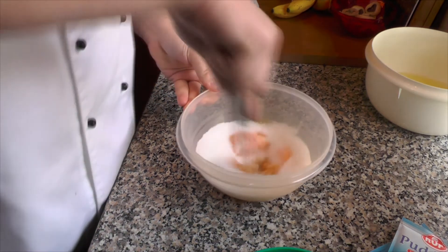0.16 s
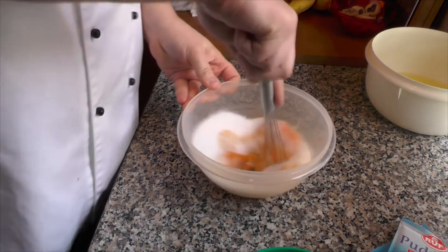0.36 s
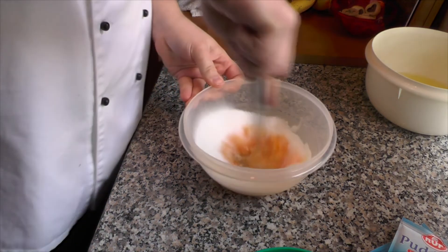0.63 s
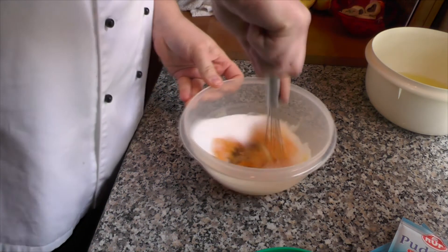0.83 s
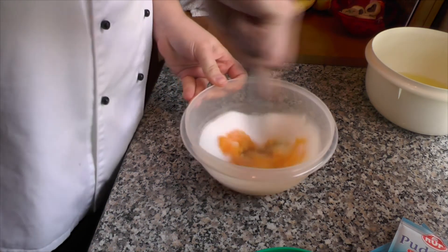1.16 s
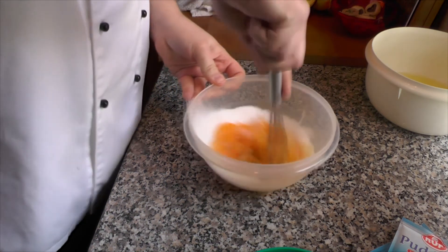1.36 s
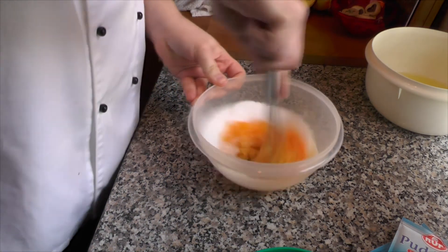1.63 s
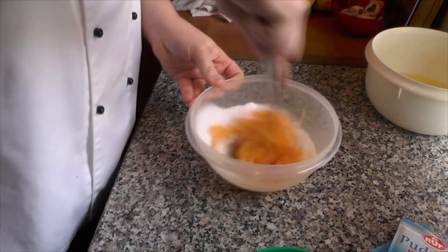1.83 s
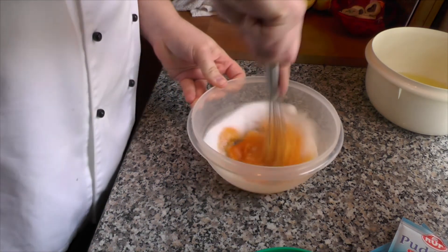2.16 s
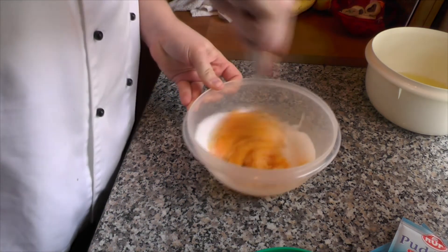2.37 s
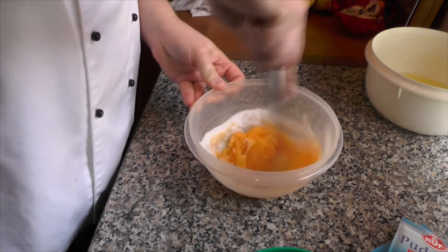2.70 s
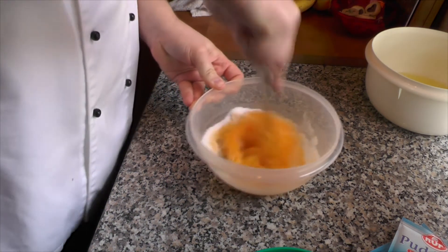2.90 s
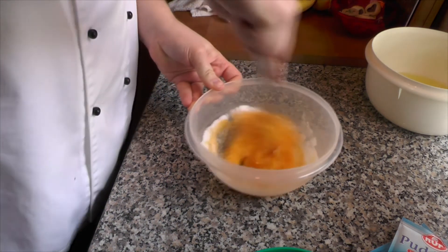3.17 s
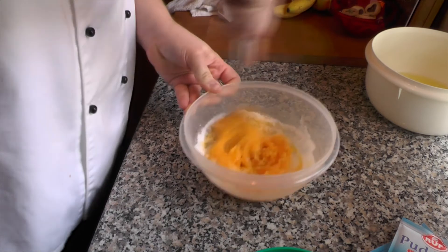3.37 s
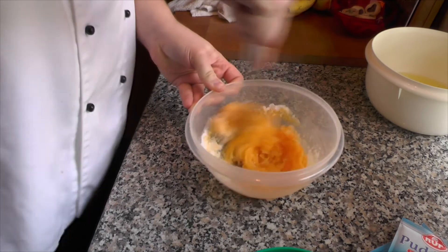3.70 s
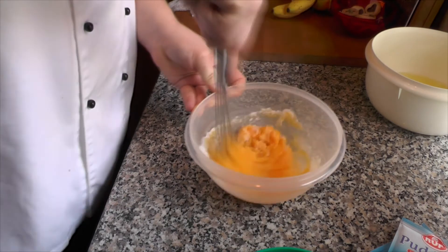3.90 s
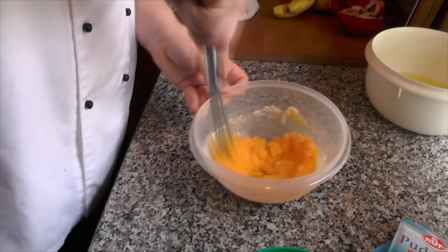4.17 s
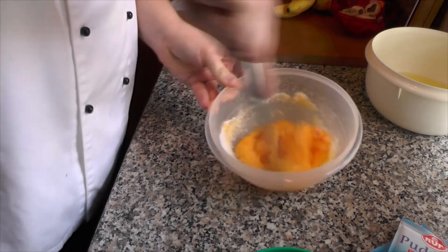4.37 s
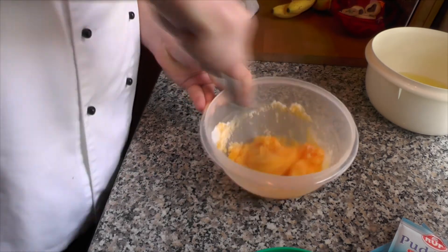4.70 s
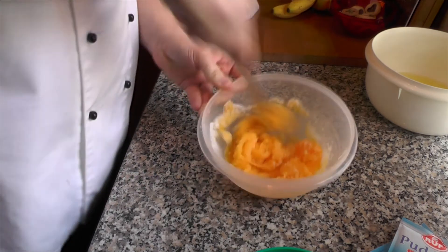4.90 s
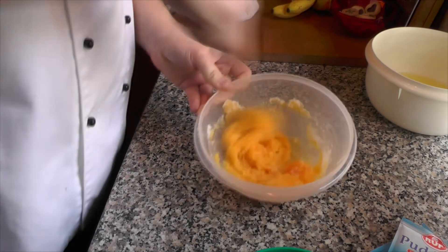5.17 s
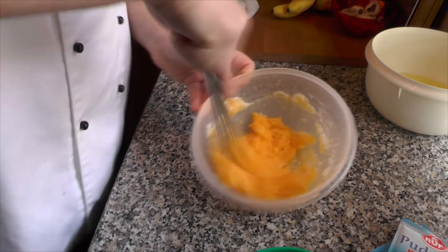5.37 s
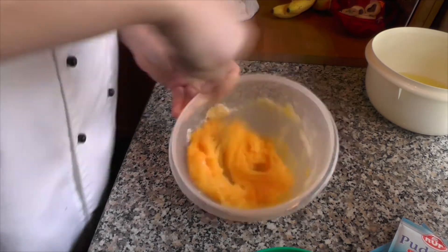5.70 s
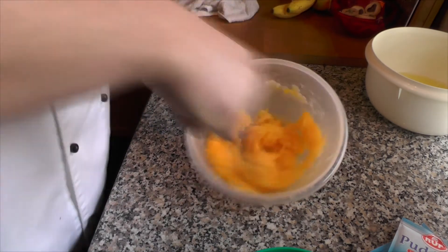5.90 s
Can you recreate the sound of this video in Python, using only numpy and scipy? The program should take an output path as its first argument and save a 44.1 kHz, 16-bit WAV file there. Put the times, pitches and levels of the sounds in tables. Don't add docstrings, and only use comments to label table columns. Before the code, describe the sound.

A metal wire whisk beats yolks and sugar briskly in a thin plastic bowl on a stone counter, already in motion at 0 s and still going at the end, just past 6 s. Several irregular strokes per second each bring a short grainy scrape, a hollow plastic hum and rattling wire taps. From 0 to 1.2 s the scrapes are fairly light with hollow knocks; fuller knocks land near 1.3 and 1.6 s. Around 2.5 s crystals snap more sharply. From 3.3 to 4 s the grit is strongest, with bright cracks near 3.4 and 3.9 s and a faint dull counter bump near 3.6 s. Crisp clusters follow at 4.2-4.9, 5.1-5.2 and 5.5-5.8 s, ending on a bright clatter near 6.03 s. The bowl hum thins late. The kitchen is small and dry with soft air noise; the right is clear and louder, the left shaded and reflected.

```python
import sys
import numpy as np
from scipy import signal
from scipy.fft import rfft, irfft, next_fast_len
from scipy.io import wavfile

SR = 44100
rng = np.random.default_rng(int(sys.argv[2]) if len(sys.argv) > 2 else 0)


def how_loud(loudness_db):
    steps = np.asarray(loudness_db, float) / 20
    return 10 ** steps


def wav_record(signal):
    frames = np.transpose(np.atleast_2d(signal))
    bounded = np.clip(frames, -1, 1)
    quanta = np.round(bounded * 32767).astype(np.int16)
    wavfile.write(sys.argv[1], SR, quanta)


N = 266364

# start_s, hold_s, wall_flex_db, bowl_hum_re_flex_db
DRAGS = [(0.0, 0.033, -37.5, -3), (0.053, 0.035, -31.5, -4.5), (0.147, 0.081, -36.5, 4),
         (0.324, 0.051, -28, -3.5), (0.433, 0.067, -32.5, -3.5), (0.531, 0.15, -27.5, -4),
         (0.808, 0.1, -25, -4.5), (1.09, 0.094, -27, -7.5), (1.295, 0.098, -32.5, 2),
         (1.566, 0.084, -33.5, 5.5), (1.68, 0.068, -32, -3), (1.84, 0.056, -31, 2),
         (1.95, 0.083, -32.5, -8), (2.153, 0.087, -34, -7), (2.246, 0.11, -33.5, -8),
         (2.435, 0.03, -32, 1.5), (2.56, 0.095, -38.5, -1), (2.707, 0.0054, -26, -3.5),
         (2.892, 0.035, -29, 2), (3.004, 0.33, -35, -6), (3.275, 0.15, -32.5, -8), (3.504, 0.39, -36, -5),
         (3.857, 0.061, -26.5, -10), (4.125, 0.024, -27, -3), (4.33, 0.03, -37.5, 3),
         (4.704, 0.12, -36, -10), (5.046, 0.096, -40, -1.5), (5.36, 0.01, -40, -5),
         (5.476, 0.012, -40.5, 7), (5.665, 0.25, -38, -5), (6.021, 0.068, -41.5, 14.5)]
FLEX_RISE_DB_PER_S, FLEX_FALL_DB_PER_S, FLEX_REST_DB = 3000, 117, -43.5
HUM_RISE_DB_PER_S, HUM_FALL_DB_PER_S, HUM_REST_DB = 4000, 135, -55
# mode_hz, level_db, t60_s
BOWL_MODES = [(309, -3, 0.061), (359, 0, 0.062), (408, -8.5, 0.044), (472.5, 0, 0.12), (519, -4, 0.065),
              (589.7, -2, 0.2), (656.4, 5, 0.056), (719.4, 4.5, 0.18), (773, 2.5, 0.2), (829.6, 2.5, 0.15),
              (901, 1, 0.17), (986, -3, 0.082)]
# mode_hz, level_db, t60_s
WALL_MODES = [(1128, -3.5, 0.059), (1198, -2.5, 0.024), (1258.4, 8.5, 0.11), (1365, 12, 0.038),
              (1430, 11.5, 0.028), (1489, 11, 0.023), (1570, 13.5, 0.027), (1680, 2, 0.024),
              (1830, 9, 0.023), (2015, 5.5, 0.028), (2322, 5, 0.041)]
THICKEN_DB_PER_S, THICKEN_BELOW_HZ = 0.5, 620
RADIATES_ABOVE_HZ = 404

# start_s, hold_s, wall_grit_db, crystal_hiss_re_grit_db
PASSES = [(0, 0.1, -35, -11), (0.16, 0.093, -35, 0.5), (0.32, 0.024, -31.5, -4.5),
          (0.412, 0.085, -30.5, -2.5), (0.572, 0.035, -31.5, -1), (0.65, 0.094, -36, 0.5),
          (0.804, 0.041, -29.5, -4.5), (0.899, 0.1, -29, -1), (1.1, 0.15, -31.5, -3),
          (1.317, 0.2, -29, -5.5), (1.595, 0.028, -25, -13), (1.689, 0.083, -30, -3),
          (1.846, 0.032, -34, -8), (1.944, 0.11, -29, -5), (2.216, 0.1, -27, -6), (2.491, 0.2, -26.5, -3),
          (2.723, 0.21, -32, -5), (3.01, 0.11, -27.5, 0), (3.295, 0.23, -23.5, -0.5),
          (3.616, 0.094, -25.5, 0), (3.879, 0.079, -21.5, -1.5), (4.126, 0.034, -25.5, 0.5),
          (4.192, 0.033, -26.5, 3), (4.374, 0.044, -26.5, -1.5), (4.503, 0.033, -29.5, 5.5),
          (4.741, 0.03, -27.5, -1.5), (4.81, 0.06, -26.5, 2.5), (5.062, 0.17, -25.5, -1),
          (5.358, 0.092, -30, -3), (5.485, 0.025, -25.5, -6), (5.65, 0.03, -30.5, -3),
          (5.715, 0.13, -29, -2), (5.973, 0.14, -26.5, -5.5)]
GRIT_RISE_DB_PER_S, GRIT_FALL_DB_PER_S, GRIT_REST_DB = 235, 188, -39
HISS_RISE_DB_PER_S, HISS_FALL_DB_PER_S, HISS_REST_DB = 291, 217, -41.5
# frequency_hz, density_db_per_hz
GRIT_COLOUR = [(1060, -1), (1800, -6), (3500, -2.5), (5500, -7), (6500, -14.5), (8450, -37), (14300, -120)]
# frequency_hz, density_db_per_hz
HISS_COLOUR = [(3600, -7), (5000, -3), (6000, 2.5), (8000, 0.5), (10000, -2.5), (11300, -3.5),
               (12600, -1.5), (15700, -5.5), (16400, 0.5)]
# time_s, pitch_hz
PATCH = [(0.0, 2650), (0.07, 1990), (0.12, 2670), (0.39, 2260), (0.72, 3080), (0.81, 2040), (1.01, 3300),
         (1.66, 2700), (4.24, 3400), (4.34, 2280), (4.41, 3160), (4.66, 3260), (4.69, 2530), (4.81, 3820),
         (5.05, 2470), (5.1, 2770), (5.99, 2460), (6.04, 3480)]
PATCH_DB, PATCH_OCTAVES = 5, 1

# start_s, peak_db, pitch_hz
SPARKS = [(0.0543, -27, 7100), (0.1625, -24, 10500), (0.2316, -24, 7000), (0.4155, -23, 9090),
          (0.5287, -24, 7780), (0.5666, -19, 7340), (0.6514, -24, 7830), (0.7827, -18, 6580),
          (0.9018, -19, 6670), (1.2935, -27, 8230), (1.4117, -19, 8620), (1.5663, -18, 6560),
          (1.6826, -21, 7500), (1.9515, -22, 6680), (2.4872, -24, 7180), (2.7137, -20, 6740),
          (3.2864, -20, 6700), (3.3263, -19, 7400), (3.39, -13, 6900), (3.6561, -13, 8240),
          (3.8686, -29, 6540), (3.9265, -8, 8200), (4.1275, -22, 7000), (4.2385, -13, 7500),
          (4.3292, -13.5, 8160), (4.3819, -21, 13000), (4.4787, -18, 7100), (4.509, -14, 9500),
          (4.7706, -24, 10200), (4.806, -19, 13500), (4.806, -11, 10600), (5.036, -30, 7090),
          (5.0474, -19, 12900), (5.047, -14, 6670), (5.118, -21, 7050), (5.1404, -11, 8600),
          (5.2096, -17, 12200), (5.3537, -21, 10700), (5.3547, -26, 9040), (5.3607, -21, 9590),
          (5.47, -23, 7760), (5.4914, -22, 9040), (5.4925, -11, 10050), (5.4985, -18, 9800),
          (5.485, -14, 8340), (5.7745, -21, 9000), (5.815, -16, 9000), (5.7019, -21, 6650),
          (5.7683, -21, 9900), (5.9539, -30, 7200), (6.0018, -27, 6680), (6.024, -9, 7320)]
# start_s, peak_db, pitch_hz
TAPS = [(0.055, -19, 1400), (0.0728, -18, 1280), (0.163, -14, 2290), (0.2926, -16, 1270),
        (0.321, -19, 1260), (0.4252, -10.5, 1430), (0.5303, -12, 1240), (0.566, -19, 1400),
        (0.5835, -6.5, 1407), (0.611, -13, 1316), (0.653, -13.5, 1220), (0.779, -28, 1293),
        (0.805, -10, 1250), (0.821, -15, 980), (0.85, -14, 1460), (0.8774, -18, 1760), (1.131, -19, 1430),
        (1.31, -10, 1278), (1.3797, -17, 1970), (1.4948, -18, 1276), (1.578, -13, 1510), (1.586, -14, 987),
        (1.595, -11.5, 1394), (1.634, -14, 1950), (1.7454, -18, 900), (2.032, -11, 1820),
        (2.2364, -15.5, 2330), (2.3148, -18, 2300), (2.456, -17, 1130), (2.5744, -13, 1405),
        (2.626, -19, 1570), (2.7166, -36, 1400), (2.8952, -18, 1200), (2.9237, -18, 993),
        (3.0855, -17, 2300), (3.353, -16, 1270), (3.385, -10, 1550), (3.6124, -17.5, 1420),
        (3.657, -7.5, 1484), (3.872, -26, 1260), (3.9007, -10, 2440), (3.92, -15, 1360),
        (4.2238, -21, 1130), (4.3291, -14, 1830), (4.7714, -22, 1600), (5.0607, -13, 1680),
        (5.08, -17, 1270), (5.1187, -19, 1290), (5.2198, -13.5, 1590), (5.2346, -20, 1960),
        (5.3457, -22, 1530), (5.6786, -18, 1270), (5.721, -16, 1920), (5.7981, -17.5, 2110),
        (6.0294, -15, 1940)]
TAP_SHAKE_DB, TAP_SHAKE_FALL_DB_PER_S = -12.5, 700
# start_s, peak_db, pitch_hz
SKIPS = [(0.103, -15.5, 3800), (0.396, -20, 3320), (0.4992, -10, 3580), (0.5999, -19, 3390),
         (0.882, -9, 3300), (1.084, -15, 3080), (1.1341, -7.5, 3660), (1.1577, -7.5, 3180),
         (1.4144, -10, 3370), (1.4294, -10, 3420), (1.681, -23, 2600), (1.7753, -19, 3300),
         (1.9509, -9, 2720), (2.2816, -11, 3570), (2.5615, -10.5, 3000), (2.5774, -13, 2680),
         (2.6494, -10, 3350), (2.7135, -10, 3960), (2.9172, -14, 2610), (2.963, -15, 3810),
         (3.3035, -12, 2750), (3.3114, -9, 2450), (3.3944, -10, 3220), (3.415, -2, 3760),
         (3.4614, -11, 3350), (3.6131, -9, 3390), (3.9014, -2, 4380), (3.9644, -16, 4620),
         (4.2047, -4, 5960), (4.3825, -11, 3740), (4.7505, -12, 3380), (4.7706, -12.5, 3440),
         (4.8448, -8, 2920), (4.8678, -18, 2730), (5.061, -9.5, 2870), (5.1182, -14, 2740),
         (5.133, -8, 5840), (5.1475, -9, 2700), (5.17, -11, 3240), (5.186, -9, 3960), (5.2214, -24, 3630),
         (5.2374, -8, 3520), (5.4984, -16, 3350), (5.499, -10, 2160), (5.478, -12, 2030),
         (5.678, -17, 2730), (5.702, -11, 4460), (5.716, -9, 3420), (5.7614, -16, 3020), (5.776, -15, 3200),
         (5.7425, -27, 3300), (5.664, -17, 3220), (5.7976, -6.5, 4700), (5.9714, -15.5, 2580),
         (6.0012, -28, 2770), (6.026, -9, 3530), (6.0354, -4, 3800)]
# start_s, peak_db, tilt_db_per_octave, following_wires_rattle_db
KNOCKS = [(0.057, -19, -7.5, -10), (0.293, -13, -5.5, -2), (0.421, -31, 11, 2), (0.474, -15.5, -3.5, -1),
          (0.531, -20, -8, 4), (0.581, -30, -1, 6), (0.779, -13.5, 0, 3), (1.086, -15.5, -7, -2),
          (1.155, -12.5, 4, 2), (1.31, -7, -12.5, -9), (1.583, -10, -11.5, -1), (1.683, -12, 24, -5),
          (1.841, -16, 12, -2.5), (1.954, -15, 9, -8), (2.158, -17.5, -3.5, -8), (2.437, -18, -11, 1),
          (2.713, -10.5, 3, -23), (2.895, -15, -12, -3), (3.292, -37, 4, -3), (3.382, -15.5, 6, -18),
          (3.504, -17, -10, -1), (3.656, -25, 17, 0), (3.874, -22, -5, 3), (4.329, -8.5, 22, -3),
          (4.704, -21.5, -3.5, -8), (5.048, -15, 19, -5), (5.359, -21.5, -6.5, 3), (5.477, -23.5, -10.5, 8),
          (5.662, -28, 6, -2), (6.008, -17.5, 28, -7)]
RATTLE_S = 0.058
# start_s, peak_db, pitch_hz, top_re_peak_db
TICKS = [(0.419, -15.5, 1970, -17.5), (0.585, -25, 1430, -18), (0.6533, -19.5, 3560, -21),
         (0.905, -18, 1930, -26), (0.236, -21.5, 2500, -19), (1.295, -22.5, 3780, -14),
         (2.009, -18, 3000, -36), (1.4, -15.5, 3680, -26), (1.571, -20, 3600, -10),
         (1.6808, -15, 2650, -22), (1.9486, -20.5, 2720, -17), (0.5293, -22, 3470, -17),
         (2.2791, -15.5, 2620, -23), (2.487, -15, 2440, -24), (3.2903, -14.5, 2450, -18),
         (3.386, -15.5, 2820, -11), (3.415, -17, 3770, -18), (3.452, -11.5, 2270, -15),
         (3.504, -13.5, 3080, -26), (5.184, -22, 3520, -24), (3.021, -19, 2480, -13),
         (4.331, -16.5, 1780, -16), (4.476, -23, 4140, -11), (4.8207, -14.5, 4160, -12.5),
         (5.209, -17.5, 2030, -15), (5.359, -18.5, 3060, -15), (5.493, -17, 2100, -15),
         (5.656, -26, 2640, -23), (5.7378, -19.5, 2120, -15), (5.7676, -12.5, 2260, -16)]
JOLT_RISE_DB_PER_S, JOLT_FALL_DB_PER_S = 4000, 786
JOLT_GRIT_DB, JOLT_HISS_DB = -1.5, 11
# start_s, peak_db, pitch_hz
BUMPS = [(0.449, -50, 120), (0.559, -51, 121), (1.312, -48, 208), (1.402, -49, 100), (1.587, -38, 197),
         (2.452, -57, 222), (2.492, -61, 80), (2.896, -35.5, 179), (3.29, -51, 121), (3.598, -30.5, 230),
         (4.239, -53, 70), (4.328, -40.5, 180), (5.15, -48.5, 90), (5.238, -44.5, 217), (5.489, -56, 90),
         (5.77, -50, 80)]
# start_s, peak_db, pitch_hz
SNAPS = [(0.5663, -8, 3800), (0.977, -6, 3050), (1.1361, -6, 2930), (1.2581, -8, 3600), (1.3123, -4, 1770),
         (1.3816, -6, 2870), (1.9529, -6, 4120), (2.0421, -8, 2820), (2.4885, -2, 3680), (2.5632, -3, 4040),
         (3.2901, -3, 2780), (3.3279, -5, 3570), (3.3737, -2, 4180), (3.6574, -2, 3730), (3.8872, -4, 2860),
         (3.9281, -1, 5570), (3.9455, -2, 4790), (4.2403, -1, 6810), (4.2478, -1, 5260), (4.33, -1, 3060),
         (4.524, -6, 4960), (4.5494, -6, 3900), (4.8078, -5, 6060), (4.8574, -5, 5120), (5.1201, -7, 3130),
         (5.142, -2, 6460), (5.1548, -3, 5050), (5.4272, -7, 3360), (5.4928, -1, 5560), (6.0136, -8, 2870)]

# frequency_hz, density_db_per_hz
AIR_COLOUR = [(20, 9), (40, 6), (70, 0), (120, 6.5), (200, 9.5), (300, 6), (500, 5), (1500, 2),
              (16000, -24)]
AIR_DB = -58
KITCHEN_T60_S, KITCHEN_DB, KITCHEN_CUT_HZ = 0.074, -6.5, 18000
# frequency_hz, left_minus_right_db
SHADE = [(100, 0.5), (210, 0), (330, -12.5), (500, -16.5), (770, -11), (1170, -10), (1790, -9.5),
         (2740, -11.5), (4190, -12), (6410, -13.5), (8000, -6.5), (9810, -2), (15000, -8)]
# frequency_hz, share_0_to_1
DIRECT_SHARE = [(200, .72), (450, .42), (740, .42), (1220, .62), (2010, .6), (3330, .52), (5500, .33),
                (9080, .68), (15000, .92)]
# frequency_hz, left_lead_rad
LEFT_LEAD = [(340, -0.94), (780, 0.99), (1380, 0.21), (3620, -0.47), (6550, 0.75), (8300, 1), (9300, 0.22)]


def rms_one(x):
    return x / np.sqrt(np.mean(x ** 2) + 1e-20)


def at_hz(points, hz):
    table = np.array(points)
    return np.interp(np.log(hz + 1), np.log(table[:, 0]), table[:, 1])


def coloured(x, gain_at):
    size = next_fast_len(N + SR)
    hz = np.arange(size // 2 + 1) * SR / size
    return irfft(rfft(x, size) * gain_at(hz), size)[..., :N]


def drift(rate_hz):
    r = np.exp(-2 * np.pi * rate_hz / SR)
    slow = signal.lfilter([1], [1, -2 * r, r * r], rng.standard_normal(N + SR))
    return rms_one(slow[SR:])


def ring(clicks, hz, t60_s):
    r, w = how_loud(-60 / (t60_s * SR)), 2 * np.pi * hz / SR
    return signal.lfilter([0, np.sin(w)], [1, -2 * r * np.cos(w), r * r], clicks + 1e-18)


def grains(per_s, spread_db, clump_db, clump_rate):
    sizes = how_loud(spread_db * np.minimum(rng.exponential(1, N), 5)) * rng.choice([-1, 1], N)
    born = rng.random(N) < per_s / SR
    return sizes * born * how_loud(clump_db * drift(clump_rate))


def add(track, s, piece):
    i = round(s * SR)
    track[i:i + len(piece)] += piece[:N - i]


def contact(s, hold, db, rise_db_per_s, fall_db_per_s, rest_db):
    t = np.arange(0, N + 64, 64) / SR
    early = np.maximum(s[:, None] - t, 0)
    late = np.maximum(t - (s + hold)[:, None], 0)
    each_db = db[:, None] - rise_db_per_s * early - fall_db_per_s * late
    power = how_loud(rest_db) ** 2 + np.sum(how_loud(each_db) ** 2, axis=0)
    return np.interp(np.arange(N) / SR, t, 10 * np.log10(power))


def together(a_db, b_db):
    return 10 * np.log10(how_loud(a_db) ** 2 + how_loud(b_db) ** 2)


def rumble(hum_db):
    air = coloured(rng.standard_normal((2, N)), lambda hz: how_loud(at_hz(AIR_COLOUR, hz)))
    band = signal.butter(2, [90, 220], "band", fs=SR, output="sos")
    shudder = rms_one(signal.sosfilt(band, rng.standard_normal(N)))
    shudder = how_loud(hum_db - 28.0 + 3.5 * drift(18)) * shudder
    return how_loud(AIR_DB + 6.0 * drift(9.8)) * rms_one(air) + shudder * [[.7], [1]]


def hum(modes, level_db, per_s):
    shake = how_loud(level_db) * grains(per_s, spread_db=2.0, clump_db=2.4, clump_rate=81)
    damped_db = THICKEN_DB_PER_S * (np.arange(N) / SR - 2)
    signs, place = rng.choice([-1, 1], (3, N)), drift(11.0)
    out = np.zeros(N)
    for k, (hz, db, t60_s) in enumerate(modes):
        lead_db = 0.77 * np.roll(place, k * SR // 2) - damped_db * (hz < THICKEN_BELOW_HZ)
        out += how_loud(db) * ring(shake * signs[k // 8] * how_loud(lead_db), hz, t60_s)
    return out * np.sqrt(np.mean(how_loud(level_db) ** 2) / np.mean(out ** 2))


def wall_grit(grit_db):
    clicks = grains(6000, spread_db=2.5, clump_db=1.6, clump_rate=80)
    patch = np.log2(np.interp(np.arange(N) / SR, *np.transpose(PATCH)))
    pitches, dealt = np.geomspace(1700, 6500, 18), rng.integers(0, 18, N)
    rings = np.zeros(N)
    for k, hz in enumerate(pitches):
        near_db = PATCH_DB * np.exp(-((np.log2(hz) - patch) / PATCH_OCTAVES) ** 2)
        gain = how_loud(at_hz(GRIT_COLOUR, hz) + near_db + 2.0 * drift(8.9))
        rings += gain * np.sqrt(hz) * rms_one(ring(clicks * (dealt == k), hz, 14.1 / hz))
    return how_loud(grit_db) * rms_one(rings)


def sugar_hiss(hiss_db):
    clicks = grains(12000, spread_db=3.2, clump_db=1.5, clump_rate=80)
    return how_loud(hiss_db) * rms_one(coloured(clicks, lambda hz: how_loud(at_hz(HISS_COLOUR, hz))))


def sugar():
    s, hold, db, above_db = np.transpose(PASSES)
    grit_db = contact(s, hold, db, GRIT_RISE_DB_PER_S, GRIT_FALL_DB_PER_S, GRIT_REST_DB)
    hiss_db = contact(s, hold, db + above_db, HISS_RISE_DB_PER_S, HISS_FALL_DB_PER_S, HISS_REST_DB)
    s, db, _, top_db = np.transpose(TICKS)
    jolt = lambda peak_db: contact(s, 0 * s, peak_db, JOLT_RISE_DB_PER_S, JOLT_FALL_DB_PER_S, -90)
    grit = wall_grit(together(grit_db + 0.06, jolt(db + JOLT_GRIT_DB)))
    hiss = sugar_hiss(together(hiss_db + 0.083, jolt(db + top_db + JOLT_HISS_DB)))
    return grit + hiss


def taps(rows, gain_db, cycles, rise_s):
    out, t = np.zeros(N), np.arange(SR // 40) / SR
    for s, db, hz in rows:
        w = 2 * np.pi * hz * t
        near = np.sin(w) + 0.39 * np.sin(1.255 * w + hz) + 0.26 * np.sin(0.806 * w - hz)
        add(out, s, how_loud(db + gain_db - 60 * t * hz / cycles) * (1 - np.exp(-t / rise_s)) * near)
    return out


def knocks():
    out, t = np.zeros(N), np.arange(SR // 5) / SR
    hz, level_db, t60_s = np.transpose(BOWL_MODES + WALL_MODES)[:, :, None]
    luck = rng.normal(0, 1, (len(KNOCKS), 2, len(hz), 1))
    followers = rng.standard_normal((len(KNOCKS), SR // 8)) ** 3
    late = np.maximum(t - .0008 - 0.64 / hz, 0)
    for (s, db, tilt_db, rattle_db), (strength, detune), wires in zip(KNOCKS, luck, followers):
        gain = how_loud(level_db + 3.6 * strength + tilt_db * np.log2(hz / 800) - 60 * late / t60_s)
        blow = np.sum(gain * np.sin(2 * np.pi * hz * late * (1 + 0.012 * detune)), axis=0)
        hits = np.abs(wires) ** 0.5 * np.sign(wires) * how_loud(-30 * t[:len(wires)] / RATTLE_S)
        rattle = signal.fftconvolve(hits, blow * how_loud(-60 * t / 0.071))
        add(out, s, how_loud(db + 4.0) * blow / np.abs(blow).max())
        add(out, s, how_loud(db + rattle_db) * rattle / np.abs(rattle).max())
    return out


def ticks():
    out, top, t = np.zeros(N), np.zeros(N), np.arange(SR // 40) / SR
    noise = rng.standard_normal((len(TICKS), 2, len(t)))
    rise = (1 - np.exp(-t / 0.00036)) ** 2
    for (s, db, hz, top_db), (tail, crack) in zip(TICKS, noise):
        tone = np.sin(2 * np.pi * hz * t) * how_loud(-60 * t * hz / 10.0)
        tail = rms_one(ring(tail, hz, 35.0 / hz)) * how_loud(-6 - 60 * t / 0.023)
        add(out, s, how_loud(db + 7.0) * rise * (tone + tail))
        add(top, s, how_loud(db + top_db) * rise * crack * how_loud(-60 * t / 0.083))
    return out + signal.sosfilt(signal.butter(4, 5500, "high", fs=SR, output="sos"), top)


def bumps():
    out, t = np.zeros(N), np.arange(SR // 8) / SR
    glide = t + 0.002 * (1 - np.exp(-t / 0.0025))
    envelope = how_loud(-60 * t / 0.015) * (1 - np.exp(-t / 0.0019))
    for s, db, hz in BUMPS:
        add(out, s, how_loud(db + 19.5) * np.sin(2 * np.pi * hz * glide) * envelope)
    return out


def snaps():
    out, t = np.zeros(N), np.arange(-SR // 1000, SR // 250) / SR
    for (s, db, hz), sign in zip(SNAPS, rng.choice([-1, 1], len(SNAPS))):
        shape = np.exp(-(t * hz / 0.56) ** 2) + 0.74 * (t > 0) * np.exp(-t / 0.00024)
        add(out, s - 1 / 1000, sign * how_loud(db - 2.5) * shape * np.cos(2 * np.pi * hz * t - .4))
    return out


def kitchen(x):
    t = np.arange(SR // 2) / SR
    white = rng.standard_normal((4, len(t))) * (t > .002)
    dull = signal.sosfilt(signal.butter(1, KITCHEN_CUT_HZ, fs=SR, output="sos"), white)
    tail = dull * how_loud(-60 * t / KITCHEN_T60_S) + (white - dull) * how_loud(-60 * t / (0.74 * KITCHEN_T60_S))
    tail = tail / np.sqrt(np.sum(tail ** 2, axis=1, keepdims=True))
    return signal.fftconvolve(x[None], tail, axes=1)[:, :N]


def microphones(x):
    room = kitchen(x)
    turn = 2.5 * drift(3)
    moving, facing = np.cos(turn) * room[:2] + np.sin(turn) * room[2:]
    shade = lambda hz: how_loud(at_hz(SHADE, hz))
    direct = lambda hz: np.clip(at_hz(DIRECT_SHARE, hz), 0, 1)
    left = coloured(x, lambda hz: shade(hz) * np.sqrt(direct(hz)) * np.exp(1j * at_hz(LEFT_LEAD, hz)))
    left += coloured(moving, lambda hz: shade(hz) * np.sqrt(1 - direct(hz)))
    right = x + how_loud(KITCHEN_DB) * facing
    return how_loud(2.0) * np.array([left, right])


def scene():
    s, hold, db, above_db = np.transpose(DRAGS)
    flex_db = contact(s, hold, db, FLEX_RISE_DB_PER_S, FLEX_FALL_DB_PER_S, FLEX_REST_DB)
    hum_db = contact(s, hold, db + above_db, HUM_RISE_DB_PER_S, HUM_FALL_DB_PER_S, HUM_REST_DB)
    s, db, _ = np.transpose(TAPS)
    shake_db = contact(s, 0 * s, db + TAP_SHAKE_DB, JOLT_RISE_DB_PER_S, TAP_SHAKE_FALL_DB_PER_S, -90)
    flex_db = together(flex_db - 1.0, shake_db)
    bowl = hum(BOWL_MODES, hum_db + 2.5, per_s=2500) + hum(WALL_MODES, flex_db - 1.0, per_s=3500)
    bowl += sugar()
    bowl += taps(SPARKS, gain_db=4.5, cycles=27.0, rise_s=.0001)
    bowl += taps(TAPS, gain_db=0.0, cycles=28.0, rise_s=0.00029)
    bowl += taps(SKIPS, gain_db=0.5, cycles=34.0, rise_s=0.00059)
    bowl += knocks() + ticks() + snaps()
    small = signal.butter(5, RADIATES_ABOVE_HZ, "high", fs=SR, output="sos")
    return microphones(signal.sosfilt(small, bowl) + bumps()) + rumble(hum_db)


def top_cut(x):
    return signal.sosfilt(signal.butter(12, 15760, fs=SR, output="sos"), x)


def record(dry):
    rounded = 1.1 * np.tanh(dry / 1.1)
    low_pass = signal.ellip(12, .3, 60, 15760, fs=SR, output="sos")
    return top_cut(signal.sosfilt(low_pass, rounded))


dry = scene()
out = record(dry)
wav_record(out)
```